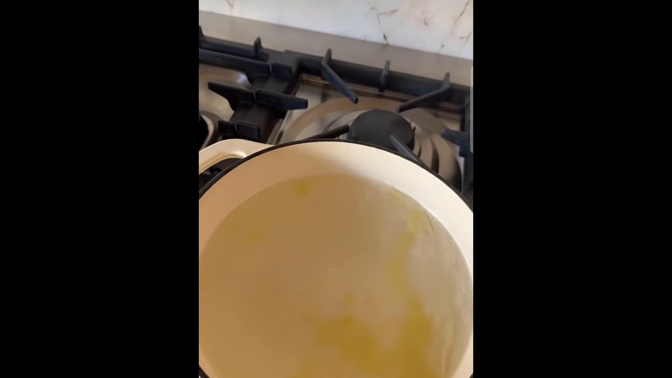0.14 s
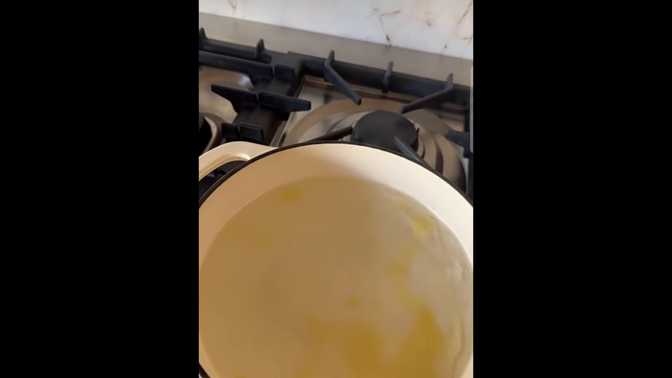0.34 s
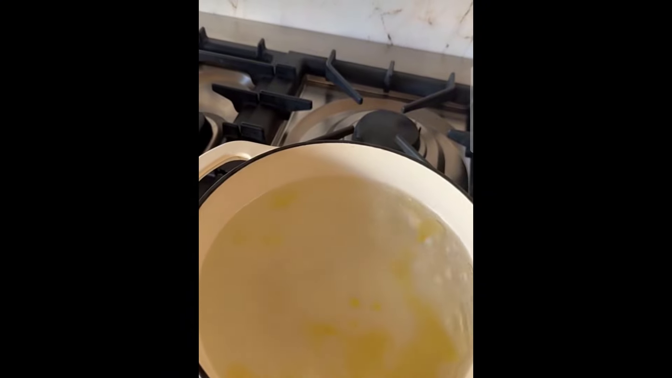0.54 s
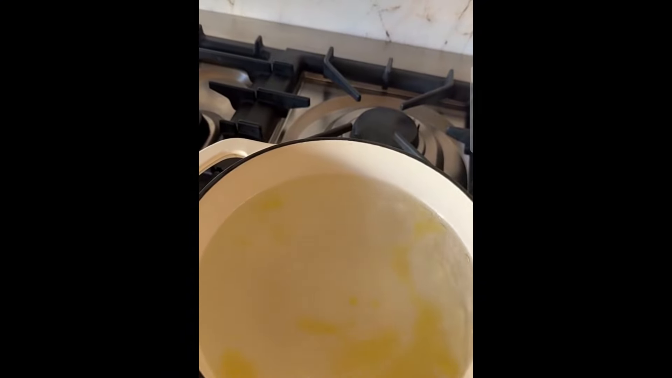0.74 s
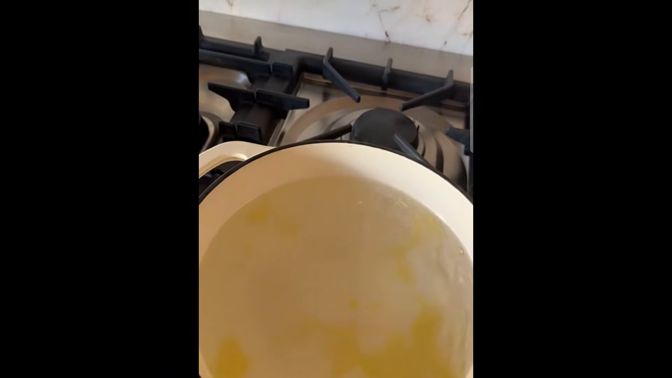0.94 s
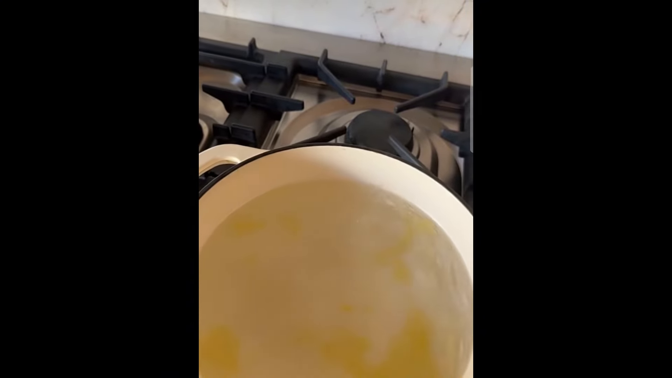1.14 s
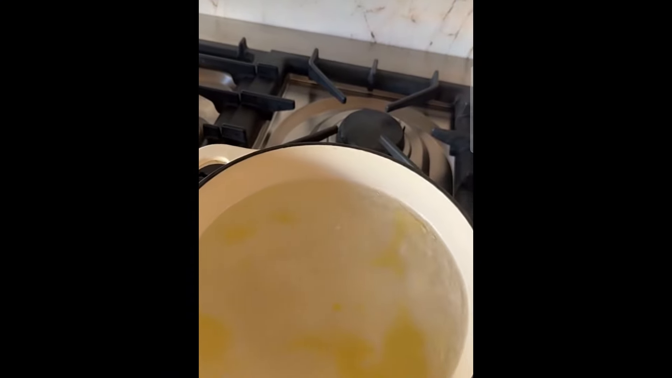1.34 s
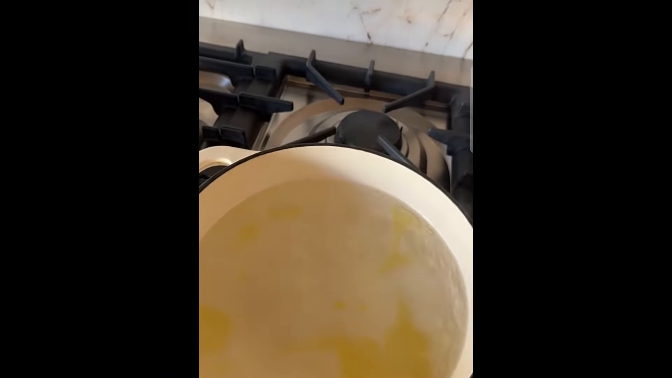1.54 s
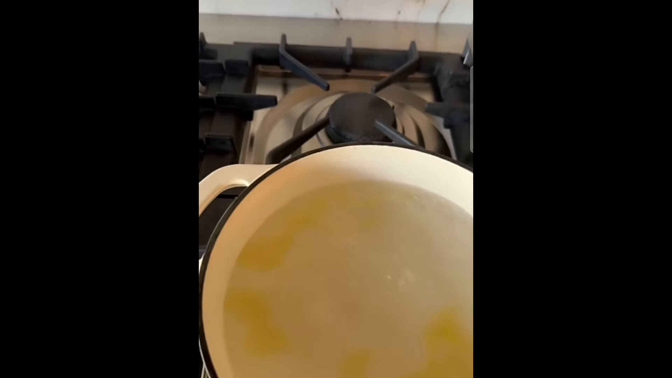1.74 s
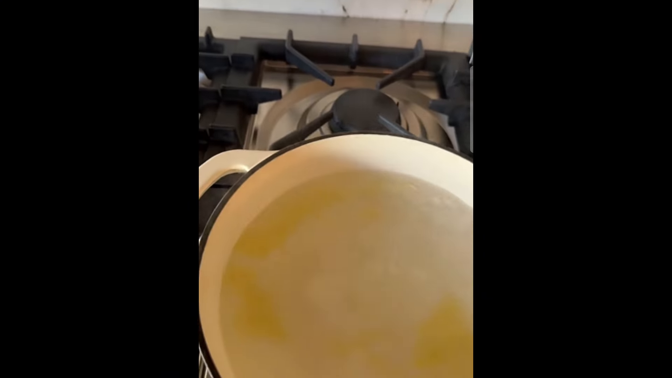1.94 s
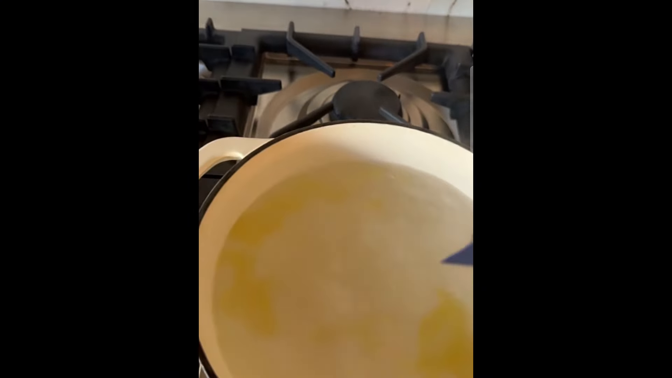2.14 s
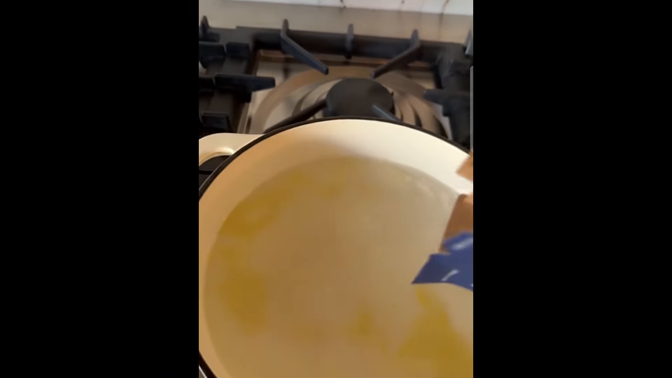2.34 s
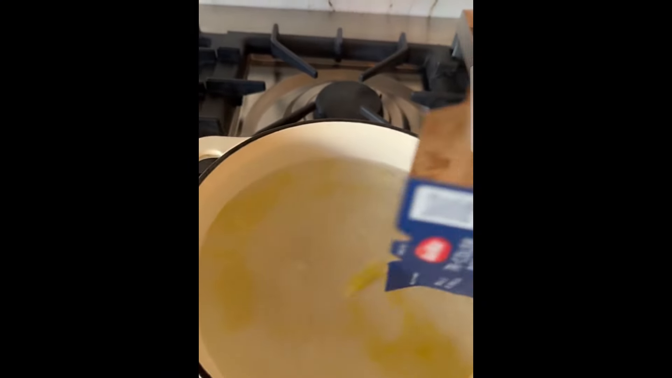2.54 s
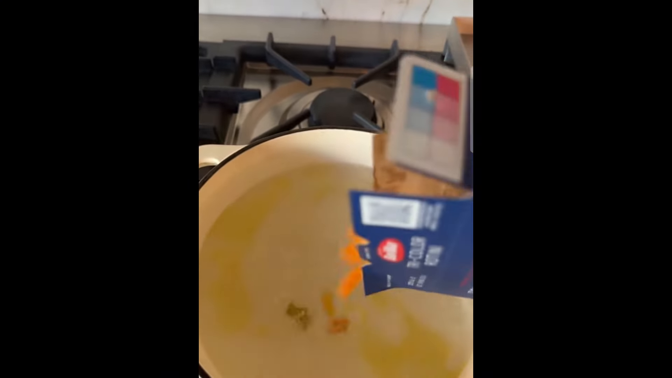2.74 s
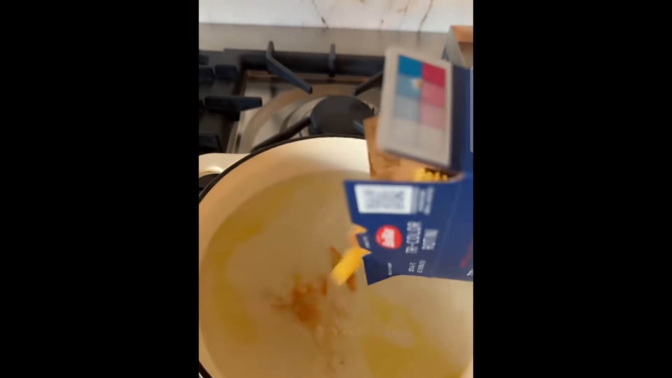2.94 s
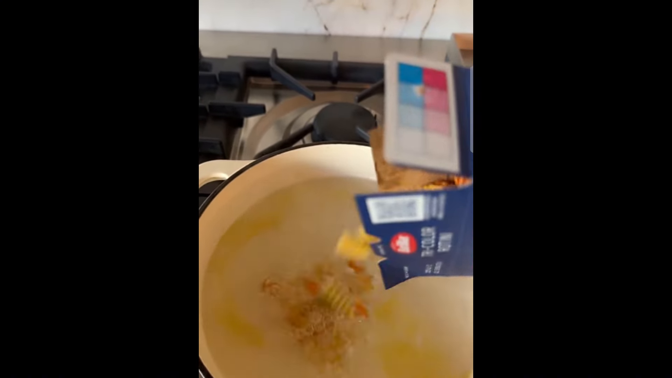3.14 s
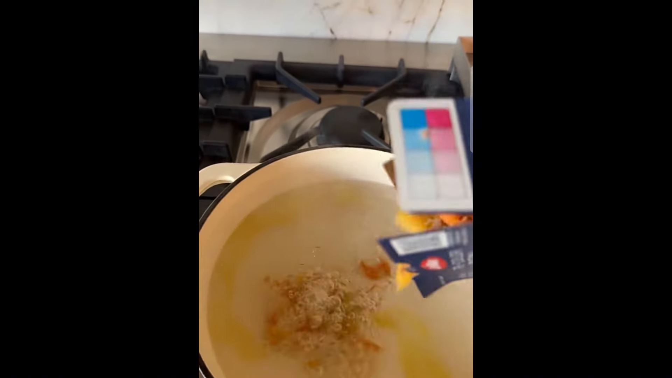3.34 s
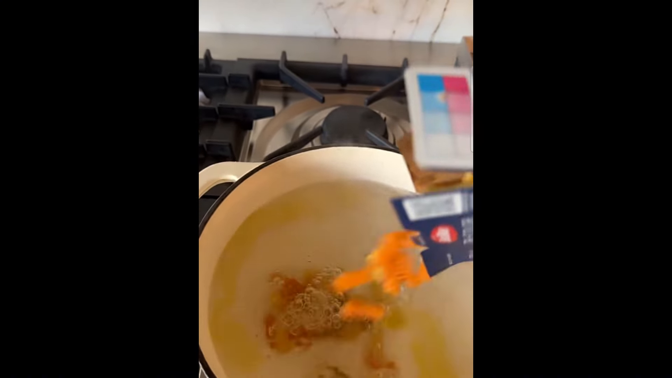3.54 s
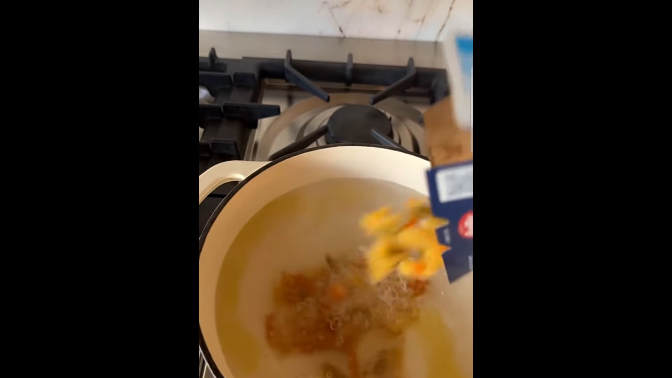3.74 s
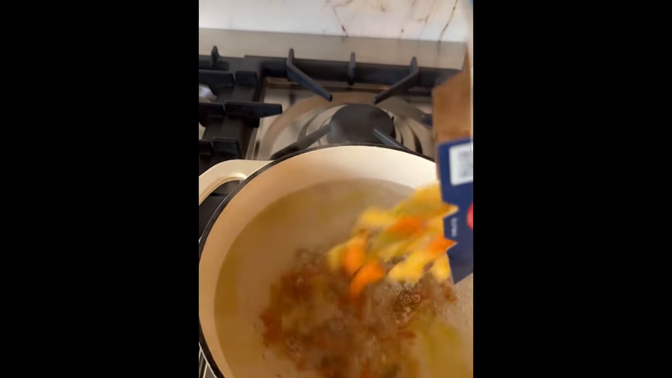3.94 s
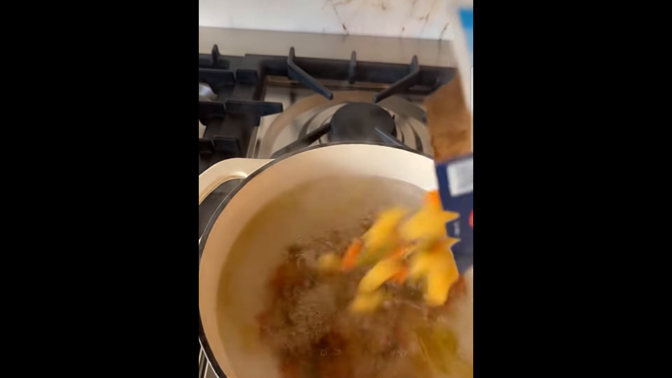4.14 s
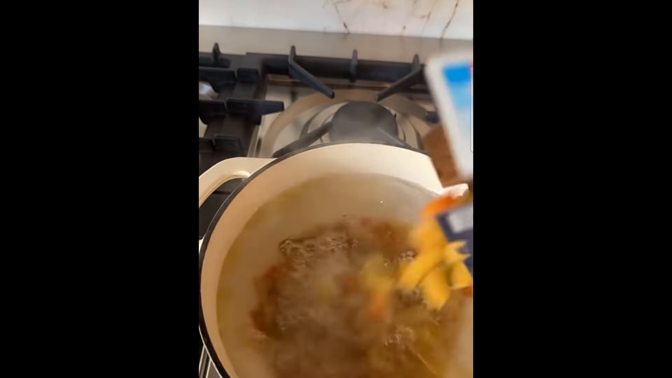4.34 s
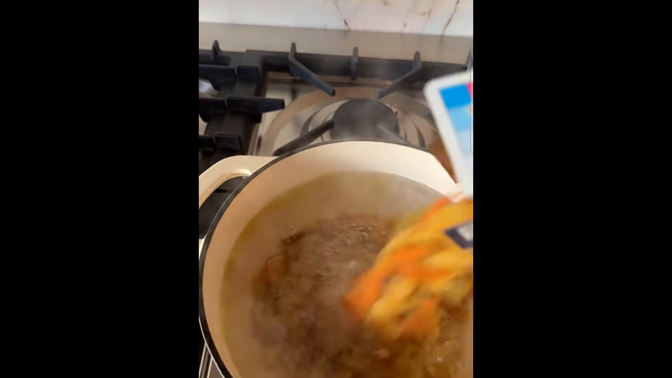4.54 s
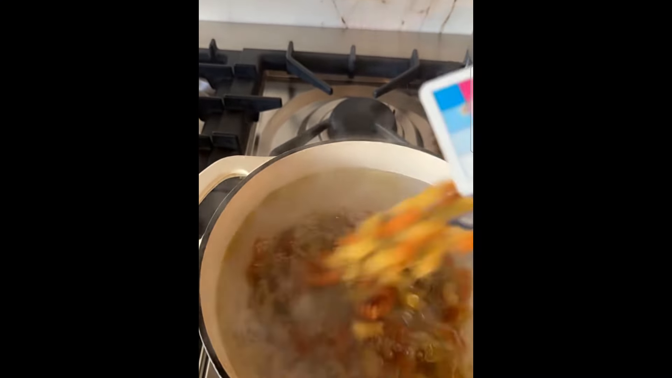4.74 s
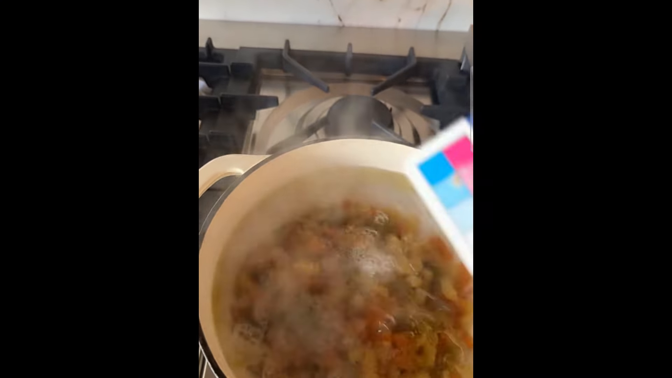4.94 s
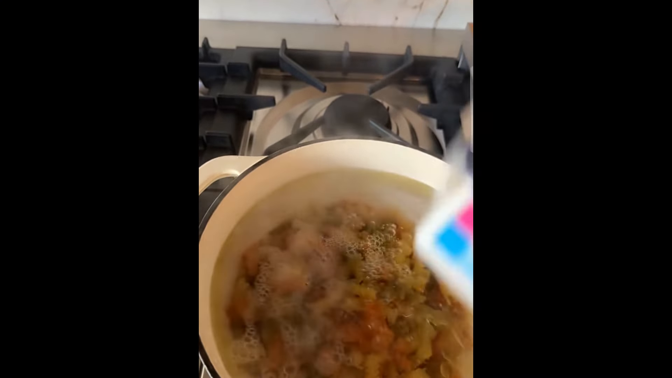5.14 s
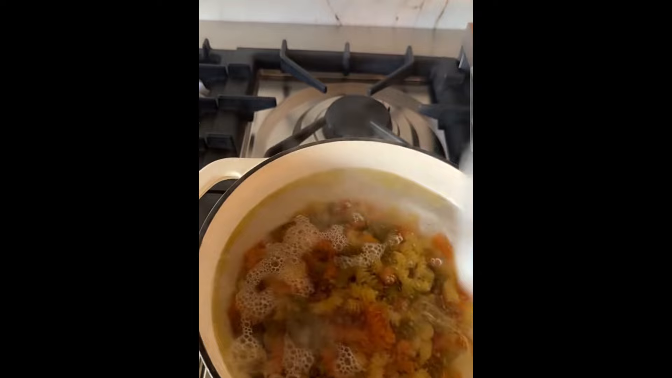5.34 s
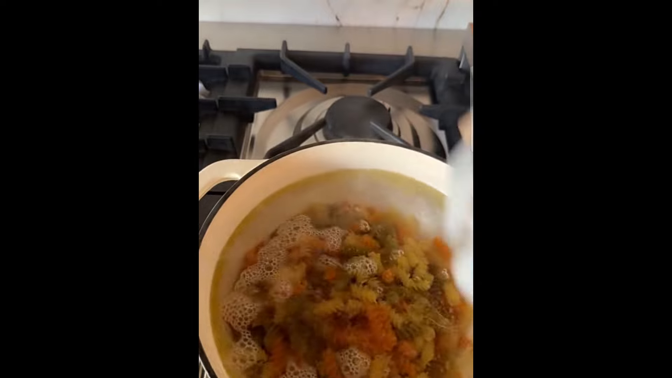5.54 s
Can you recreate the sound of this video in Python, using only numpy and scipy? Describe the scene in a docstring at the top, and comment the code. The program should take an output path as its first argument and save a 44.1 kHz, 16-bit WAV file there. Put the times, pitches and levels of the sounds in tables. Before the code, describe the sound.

In a home kitchen, a gas burner rushes softly under a simmering pot. A sharp loud knock rings the cookware and bounces, with tiny spits and faint steam squeaks after it. The sound drops to complete silence for half a second, then dry pasta slides from a cardboard box, clacking, easing off and surging again in quick regular gushes before stopping. Close microphone, short hard-walled room reverberation.

```python
"""A heavy pot of water simmers on a gas hob: coloured noise with wavering resonances, and bursts of spray as spits.
A sharp knock excites decaying modes of the cookware and bounces; two faint steam squeaks follow.
After a short silence dry pasta slides down a tilted cardboard box: random ringing contacts, clacks and thuds.
It rattles into the water in two surges, the second in regular gushes, growing crisper as the box empties."""
import sys
import numpy as np
from scipy import signal
from scipy.fft import rfft, irfft, next_fast_len
from scipy.io import wavfile
from scipy.ndimage import uniform_filter1d

SR = 44100
rng = np.random.default_rng(int(sys.argv[2]) if len(sys.argv) > 2 else 0)


def log_audio(samples):
    """Write samples as a 16-bit WAV file to the path given in sys.argv[1]."""
    # one column per channel
    frames = np.atleast_2d(samples).T
    # limit to full scale, then quantise
    limited = np.clip(frames, -1, 1)
    pcm = np.round(limited * 32767).astype(np.int16)
    wavfile.write(sys.argv[1], SR, pcm)


N = 250929
TIME = np.arange(N) / SR
CUTOFF_HZ = 15900
# flow of pasta as the box is tipped, eased back and tipped again: (time [s], level [dB])
FLOW = [(2.09, -45), (2.29, -34.5), (2.35, -33), (2.5, -30), (2.61, -26), (2.8, -26.5), (2.878, -24),
        (3.019, -32.5), (3.138, -40.5), (3.299, -34.5), (3.4, -28.5), (3.62, -23), (4.4, -22.5),
        (4.68, -25), (4.81, -35.5), (4.86, -58)]
FLOW_START_S, FLOW_END_S = FLOW[0][0], FLOW[-1][0]


def pour(air_db=3, air_width_hz=150, clump_db=0.22, hollow_hz=270):
    """Sliding pieces drum on the cardboard, clack against each other and scratch with their hard edges."""
    # colours of the box wall, the pieces and their edges: (frequency [Hz], relative level [dB])
    cardboard = [(45, -38), (110, -15), (165, -6), (280, -3.5), (450, -3), (640, -2.5), (800, -2.5),
                 (1100, 1), (1600, -4.5), (2200, -14.5), (4000, -39.5)]
    piece_colour = [(900, -13), (1650, -13.5), (2000, 1.5), (2200, -2), (2450, 0), (2900, -1), (3500, -5.5),
                    (4300, -9.5), (5100, -41), (7000, -19.5), (12000, -48)]
    edge_colour = [(2500, 1.5), (4500, 3), (6500, -1.5), (8000, -3), (10000, -3.5), (11200, -11),
                   (12800, -7), (16000, -0.5)]
    # steady narrow resonances of the air in the box, rung by the clacking pieces: (frequency [Hz], width [Hz],
    # gain [dB])
    box_air_rings = [(1967, 56, -7), (2405, 150, 5), (2750, 120, -6), (3300, 39, -12.5), (4230, 80, -8),
                     (4430, 60, 8)]
    # each sound against the flow:
    # (level with the box full [dB], change once empty [dB], lateness [power], swing in a gush [dB])
    card_law = (0, -8, 45, 1)
    piece_law = (-4, 6, 1.7, 2)
    edge_law = (-14.5, 15, 3, 1.5)
    # hollow low note of the still full box as the pasta starts to slide: (time [s], level [dB])
    hollow_level = [(2.1, -55), (2.3, -45), (2.45, -58), (2.7, -65)]
    # contacts come faster with the flow, following only a share of its swing in dB
    full_flow_db, contacts_per_s, rate_follows = -24, 3300, .55
    air_full_hz, air_empty_hz = 874, 705

    flow_db, gone = flow()
    per_s = contacts_per_s * from_db(rate_follows * (flow_db - full_flow_db))
    card = colour(contacts(per_s, 82.6, 2690, cycles=8.4, spread_db=0.0), cardboard)
    card = boom(card, gone)
    air_hz = air_full_hz + (air_empty_hz - air_full_hz) * gone
    card = card + from_db(air_db) * box_air(card, air_hz, air_width_hz)

    pieces = colour(contacts(.8 * per_s, 1544, 6720, cycles=14.7, spread_db=1.0), piece_colour)
    pieces = pieces + sum(from_db(db) * resonance(pieces, hz, width_hz) for hz, width_hz, db in box_air_rings)
    edges = colour(contacts(3.2 * per_s, 3070, 14100, cycles=15, spread_db=1.5), edge_colour)

    # the pasta tumbles in small clumps, which all three sounds share
    clumps = from_db(clump_db * wobble(41))
    layers = [(card, card_law), (pieces, piece_law), (edges, edge_law)]
    rattle = sum(at_level(layer * clumps, follow_flow(law)) for layer, law in layers)
    hollow = at_level(resonance(card, hollow_hz, 19.0), in_time(hollow_level)[0])
    return pouring() * (rattle + hollow)


def flow():
    """The flow in dB, and the share of the pasta that has left the box, from the running sum of the flow."""
    db = in_time(FLOW)[0]
    gone = np.cumsum(from_db(db) * pouring())
    return db, gone / gone[-1]


def pouring(release_s=0.044):
    """1 while pasta is moving, closing as the last pieces leave."""
    return (TIME > FLOW_START_S) * np.clip(1 - (TIME - FLOW_END_S) / release_s, 0, 1)


def follow_flow(law):
    """Level in dB of a sound that follows the flow, swells with each gush and changes as the box empties."""
    # in the second surge the pasta leaves in regular gushes
    gush_from_s, gush_to_s, gush_crest_s, gush_period_s = 3.5, 4.745, 4.04, .166
    full_db, change_db, lateness, gush_db = law
    flow_db, gone = flow()
    gushing = (TIME > gush_from_s) * (TIME < gush_to_s)
    gush = gushing * np.cos(2 * np.pi * (TIME - gush_crest_s) / gush_period_s)
    return flow_db + full_db + change_db * gone ** max(lateness, .1) + gush_db * gush


def contacts(per_s, low_hz, high_hz, cycles, spread_db, count=24):
    """Random contacts of uneven size, each ringing for some cycles at the pitch of one of many pieces."""
    sizes = from_db(spread_db * np.minimum(rng.exponential(1, N), 4)) * rng.choice([-1, 1], N)
    clicks = sizes * (rng.random(N) < per_s / SR)
    dealt = rng.integers(0, count, N)   # which piece each click strikes
    pitches = np.geomspace(low_hz, min(high_hz, CUTOFF_HZ), count)
    return sum(resonance(clicks * (dealt == k), hz, 2 * hz / cycles) for k, hz in enumerate(pitches))


def boom(card, gone, boom_hz=420, full_db=2.5, empty_db=-9.5):
    """The pasta's weight makes the box wall boom: a low shelf that sinks as the box gets lighter."""
    low = signal.sosfilt(signal.butter(1, boom_hz, fs=SR, output="sos"), card)
    shelf_gain = from_db(full_db + (empty_db - full_db) * gone)
    return card + (shelf_gain - 1) * low


def box_air(x, air_hz, width_hz, count=6):
    """The air in the box resonates lower as it gains room: a glide across neighbouring resonances."""
    pitches = np.linspace(air_hz.min(), air_hz.max(), count)
    out = np.zeros(N)
    for hz, share in zip(pitches, np.eye(count)):
        out += np.interp(air_hz, pitches, share) * resonance(x, hz, width_hz)   # crossfade
    return out


def clacks(width_hz=380, gain_db=1, chatter_db=-1, chatter_hz=2700, thump_db=-13, thump_t60=0.044, light_t60=0.1):
    """A piece hits hard: a short swelling ring, a chatter of its neighbours and a thump of the box wall."""
    # hardest clacks in the box: (time [s], level before the common gain [dB], t60 of the chatter noise [s])
    hard = [(2.209, -26, .023), (2.307, -26, .035), (2.318, -18.5, 0.052), (2.347, -9.5, 0.021),
            (2.358, -13, 0.022), (2.372, -18, .035), (2.404, -14.5, 0.018), (2.418, -13.5, .035),
            (2.509, -16.5, 0.019), (2.566, -13, 0.058), (2.589, -8.5, 0.021), (2.592, -9.5, 0.058),
            (2.623, -10.5, 0.04), (2.711, -11.5, 0.067), (2.755, -16, 0.039), (2.784, -15, 0.033),
            (2.871, -18, 0.012), (3.386, -23, 0.014), (3.553, -17, 0.041), (4.086, -24, .02),
            (4.221, -11, 0.038), (4.377, -4.5, 0.019), (4.607, -13, .029), (4.701, -21.5, .041)]
    clack_hz, scatter = 2470, 0.043   # pitch, and its spread as a share
    light_per_s, light_db, light_spread_db = 14, 2.5, 2.5   # lighter ones at random, level against the flow

    out, click, flow_db = np.zeros(N), signal.unit_impulse(SR), flow()[0]
    light = []
    for s in random_times(FLOW_START_S, FLOW_END_S, light_per_s):
        db = np.interp(s, TIME, flow_db) + light_db + light_spread_db * rng.standard_normal()
        light.append((s, db, light_t60))
    for s, db, chatter_t60 in hard + light:
        hz = clack_hz * (1 + scatter * rng.standard_normal())
        tone = peak_one(resonance(resonance(click, hz, width_hz), hz, width_hz))
        chatter = resonance(burst(chatter_t60), chatter_hz, 1400)
        chatter = peak_one(resonance(chatter, chatter_hz, 2600))
        thump = ring(click, rng.uniform(1020, 1190), thump_t60)
        clack = tone + from_db(chatter_db) * chatter + from_db(thump_db) * thump
        add(out, s, from_db(db + gain_db) * peak_one(clack))
    return out


def thuds(gain_db=-5.5, t60=0.075):
    """A clump lands on the cardboard, which rings as a damped sine."""
    # clumps on the box wall: (time [s], level before the common gain [dB], pitch [Hz])
    clump_hits = [(2.869, -14, 827), (2.918, -10.5, 1036), (3.712, -7.5, 808), (3.855, -12, 715),
                  (4.031, -27, 770), (4.363, -8, 707)]
    out, click = np.zeros(N), signal.unit_impulse(SR // 10)
    for s, db, hz in clump_hits:
        add(out, s, from_db(db + gain_db) * ring(click, hz, t60))
    return out


def plunge(hz=70, width_hz=70):
    """A faint low churn of the water under the falling pasta: narrow noise that follows the flow."""
    # (level with the box full [dB], change once empty [dB], lateness [power], swing in a gush [dB])
    plunge_law = (-42.5, 17, .8, 0.5)
    churn = resonance(resonance(rng.standard_normal(N), hz, width_hz), hz, width_hz)
    return pouring() * from_db(follow_flow(plunge_law)) * rms_one(churn)


def knock(clatter_db=14, clatter_t60=0.3, tick_db=-27, treble_t60=.13, treble_hz=6000):
    """Each blow cracks, rings the cookware and shakes the hob; bounces are softer with a faint hard tick."""
    # knock and bounces: (time [s], strength [dB], contact brightness [Hz], push on the hob [dB])
    blows = [(0.3978, -0.5, 15880, -1.5), (0.4078, -18, 704, -8), (0.4754, -2.5, 1020, -12),
             (0.4826, -27, 500, -21), (0.556, -18, 700, -23), (.614, -18.5, 1200, -18)]
    # what the cookware rings with: (frequency [Hz], level [dB], t60 [s])
    cookware = [(239, -17, 0.12), (290, -17, 0.07), (346, -13, 0.13), (400, -27, 0.28), (467, -19, 0.15),
                (543, -28, 0.3), (571, -26, 0.32), (613, -15, 0.38), (639, -23, 0.4), (677, -23, 0.34),
                (782, -18, 0.28), (821, -10, 0.12), (970, -35, 0.4), (1174, -32, 0.4), (1372, -20, 0.48),
                (1540, -30, 0.25), (1755, -28, 0.31), (1907, -17, 0.27), (2153, -34, 0.25),
                (2265, -27, 0.3), (3628, -36, 0.2), (3828, -37, 0.24), (4030, -31, 0.19), (4119, -36, 0.35),
                (4295, -28, 0.23), (5249, -38, 0.24), (5997, -32, 0.12), (8950, -47, 0.3)]
    # the hob's slow bounce under the pot: (frequency [Hz], level [dB], t60 [s])
    hob = [(67, -19.5, 0.21), (78.7, -19, .36), (92.5, -21.5, 0.55), (154.5, -24, 0.68)]
    # quickly damped thump and crack at the point of contact: (frequency [Hz], level [dB], t60 [s])
    contact = [(367, -11, 0.013), (595, -5.5, 0.017), (2060, -8, .012), (2520, -6.5, 0.011),
               (5260, -22, 0.0219), (6120, -17, .025)]
    # dense clatter of hob and worktop under a blow: (frequency [Hz], relative level [dB])
    clatter_colour = [(50, -36.5), (150, -17.5), (330, -4.5), (750, -4.5), (1100, -5.5), (2400, -9),
                      (3000, -17), (6000, -25), (10000, -30), (16000, -40)]

    force, push, click = np.zeros(N), np.zeros(N), signal.unit_impulse(SR // 10)
    for s, db, bright_hz, push_db in blows:
        soft = dull(dull(click, bright_hz), bright_hz)
        add(force, s, from_db(db) * (soft - from_db(tick_db) * click))
        add(push, s, from_db(push_db) * click)
    shaken = colour(dying(clatter_t60, treble_hz, treble_t60), clatter_colour)[:SR]
    shaken = shaken / np.linalg.norm(shaken)
    clatter = from_db(clatter_db) * signal.fftconvolve(force, shaken)[:N]
    return struck(push, hob) + struck(force, cookware) + struck(force, contact) + clatter


def struck(force, modes):
    """Neighbouring modes swing in opposite senses, so close pairs swell and beat."""
    return sum((-1) ** k * from_db(db) * ring(force, hz, t60) for k, (hz, db, t60) in enumerate(modes))


def spits(tone_db=-3, width_hz=700, t60=0.058, faint_spray_db=-6):
    """Droplets burst with a high tick and a brief spray, both from decaying noise."""
    # loudest droplets in the pot:
    # (time [s], level before tick or spray gain [dB], pitch [Hz], spray gain before its colour [dB])
    loud = [(0.8324, -38.5, 6930, -8), (0.946, -45, 5730, -8), (1.2191, -48, 5290, 3),
            (1.268, -34, 7100, -7), (3.066, -27, 4200, -6), (3.116, -32.5, 6260, -5),
            (3.1703, -32, 4430, -5), (3.1986, -27, 6560, -6), (3.787, -24, 5900, -1),
            (4.279, -13, 4540, -11), (4.303, -18, 4540, -9), (4.3967, -13, 4280, -9),
            (4.612, -13.5, 4570, -1.5), (4.729, -11, 4100, -4), (5.0396, -43, 5440, -9),
            (5.233, -45, 4520, -13)]
    # colour of the spray: (frequency [Hz], gain [dB])
    spray_colour = [(1500, -35), (4000, -13.5), (7000, -9), (11000, 3.5), (14000, 7.5), (16000, 7.5)]
    faint_per_s, faint_db, faint_hz = 1.2, -49, (4500, 7000)   # the simmer spits at random all along

    tones, spray = np.zeros(N), np.zeros(N)
    faint = [(s, faint_db, rng.uniform(*faint_hz), faint_spray_db)
             for s in random_times(0, TIME[-1], faint_per_s)]
    for s, db, hz, spray_db in loud + faint:
        add(tones, s, from_db(db + tone_db) * peak_one(resonance(burst(t60), hz, width_hz)))
        add(spray, s, from_db(db + spray_db) * peak_one(burst(t60)))
    return tones + colour(spray, spray_colour)


def squeaks():
    """Thin whistles of narrow noise that swell and fade."""
    # faint squeaks of steam: (time [s], length [s], frequency [Hz], width [Hz], level before the swell [dB])
    whistles = [(0.708, 0.063, 3160, 70, -51.5), (1.085, 0.28, 3240, 350, -60)]
    out = np.zeros(N)
    for s, length, hz, width_hz, db in whistles:
        swell = np.hanning(round(length * SR))
        whistle = rms_one(resonance(rng.standard_normal(len(swell)), hz, width_hz))
        add(out, s, from_db(db) * swell * whistle)
    return out


def burner(waver_db=2.5):
    """Rush of the flame under the simmering pot; each resonance wavers a little on its own."""
    # colour of the rush: (frequency [Hz], relative level [dB])
    rush_colour = [(15, -64.5), (25, -37), (45, -12.5), (70, 0), (229, -6.5), (344, -1), (489, -7),
                   (695, -9.5), (1130, -12), (1560, -9), (4030, -24.5), (6210, -30.5), (7110, -24),
                   (8360, -32), (16000, -37.5)]
    # resonances in the rush and the simmer: (frequency [Hz], width [Hz], gain [dB])
    rush_peaks = [(75, 41, -2), (310, 93, -19.5), (756, 150, -1.5), (1400, 50, 0.5), (1590, 170, 3),
                  (1810, 170, 3.5), (5780, 50, 12), (7400, 330, -9.5), (9170, 700, 0)]
    # loudness of the burner: (time [s], level [dB])
    rush_level = [(0, -44.5), (1.0, -46), (1.3, -45), (1.6, -46.5), (5.0, -48.5), (5.69, -47.5)]
    rush = colour(rng.standard_normal(N), rush_colour)
    peaks = np.zeros(N)
    for hz, width_hz, db in rush_peaks:
        peaks += from_db(db + waver_db * wobble(3.4)) * resonance(rush, hz, width_hz)
    return from_db(in_time(rush_level)[0]) * rms_one(rush + peaks)


def kitchen(x, wet_db, t60, treble_hz=5000, treble_t60=0.09):
    """Direct sound and the diffuse answer of the hard kitchen walls, a few ms later."""
    delay = np.zeros(round(.004 * SR))
    tail = np.concatenate([delay, dying(t60, treble_hz, treble_t60)])
    return x + from_db(wet_db) * signal.fftconvolve(x, tail)[:N]


def from_db(db):
    """Decibels to gain."""
    return 10 ** (np.asarray(db) / 20)


def rms_one(x):
    """Scale to an rms of 1."""
    return x / np.sqrt(np.mean(x ** 2) + 1e-20)


def peak_one(x):
    """Scale to a peak of 1."""
    return x / np.abs(x).max()


def in_time(rows):
    """Each column of a curve at every sample."""
    s, *columns = np.transpose(rows)
    return [np.interp(TIME, s, c) for c in columns]


def colour(x, points):
    """Causal (minimum-phase) filter with the given spectrum, by folding its cepstrum."""
    size = next_fast_len(2 * N, True)
    hz, db = np.transpose(points)
    grid = np.maximum(np.arange(size // 2 + 1) * SR / size, 1)
    gain = from_db(np.interp(np.log(grid), np.log(hz), db))
    cepstrum = irfft(np.log(gain), size)
    cepstrum[1:size // 2] *= 2
    cepstrum[size // 2 + 1:] = 0
    return irfft(rfft(x, size) * np.exp(rfft(cepstrum)), size)[:N]


def ring(clicks, hz, t60):
    """A unit click sets a decaying sine of starting height 1 ringing."""
    r, w = np.exp(-np.log(1000) / (t60 * SR)), 2 * np.pi * hz / SR
    return signal.lfilter([0, np.sin(w)], [1, -2 * r * np.cos(w), r * r], clicks + 1e-18)


def resonance(x, hz, width_hz):
    """Two-pole band-pass with gain 1 on top."""
    r, w = np.exp(-np.pi * width_hz / SR), 2 * np.pi * hz / SR
    zeros = np.array([1, 0, -1]) * (1 - r * r) / 2
    return signal.lfilter(zeros, [1, -2 * r * np.cos(w), r * r], x + 1e-18)


def dull(x, hz):
    """One-pole low-pass."""
    r = np.exp(-2 * np.pi * hz / SR)
    return signal.lfilter([1 - r], [1, -r], x + 1e-18)


def wobble(hz):
    """Smooth random motion with a spread of 1."""
    return rms_one(dull(dull(rng.standard_normal(N), hz), hz))


def burst(t60):
    """Noise that dies away, of unit energy."""
    t = TIME[:SR]
    noise = rng.standard_normal(SR) * np.exp(-np.log(1000) * t / t60)
    return noise / np.linalg.norm(noise)


def dying(t60, treble_hz, treble_t60):
    """A burst of noise whose treble dies sooner than the rest."""
    noise = burst(t60)
    low = signal.sosfilt(signal.butter(1, treble_hz, fs=SR, output="sos"), noise)
    extra_decay = np.exp(-np.log(1000) * TIME[:SR] * (1 / treble_t60 - 1 / t60))
    return low + (noise - low) * extra_decay


def add(track, s, sound):
    """Mix a sound into a track at a given time."""
    at = round(s * SR)
    track[at:at + len(sound)] += sound[:N - at]


def at_level(x, db):
    """Give a stream of grains a slow level curve, leaving the single grains uneven."""
    power = uniform_filter1d(x ** 2, size=3000)
    floor = np.mean(x ** 2) / 10000   # keeps sparse stretches from being blown up
    return from_db(db) * x / np.sqrt(np.maximum(power, 0) + floor)


def random_times(start, end, per_s):
    """One moment at random in each equal stretch of a span."""
    slots = np.arange(start, end - 1 / per_s, 1 / per_s)
    return slots + rng.random(len(slots)) / per_s


def scene():
    """Pasta, knock and pot sounds share the kitchen's reverberation; the burner lies dry beneath."""
    events = pour() + clacks() + thuds() + plunge() + knock() + spits() + squeaks()
    return (kitchen(events, wet_db=-11.0, t60=0.59) + burner())[None]


def record(dry):
    """The sound drops out for about half a second; peaks are rounded and the top is cut."""
    # the drop-out: (start [s], end [s])
    silence = (1.622, 2.098)
    live = (TIME < silence[0]) | (TIME > silence[1])
    rounded = 1.133 * np.tanh(dry * live / 1.116)
    return signal.sosfilt(signal.ellip(12, .1, 90, CUTOFF_HZ, fs=SR, output="sos"), rounded)


dry = scene()
out = record(dry)
log_audio(out)
```